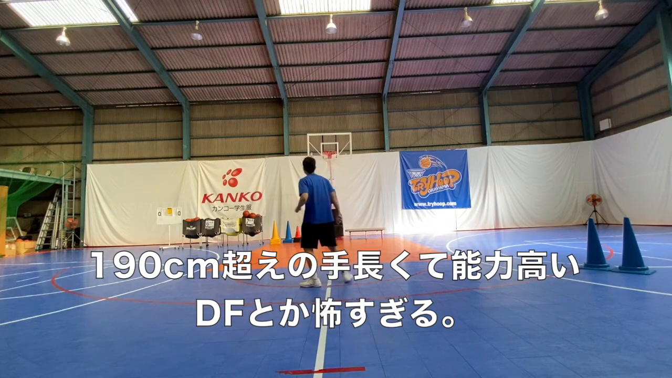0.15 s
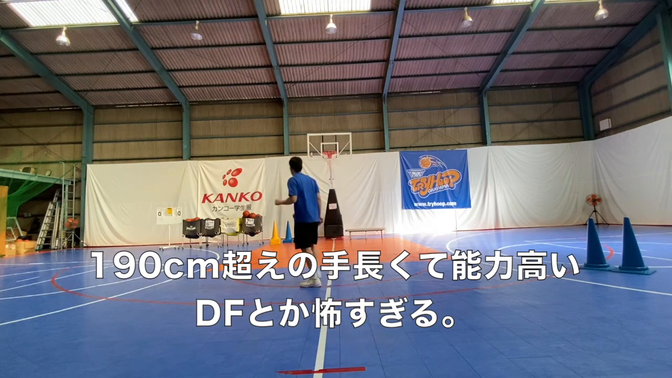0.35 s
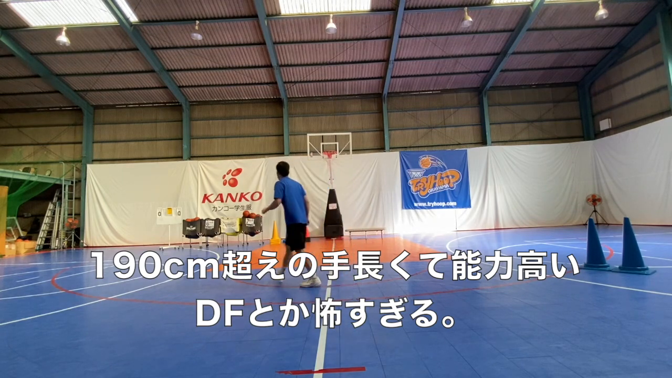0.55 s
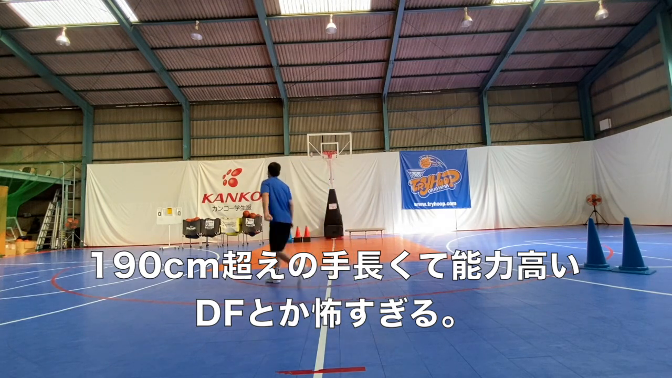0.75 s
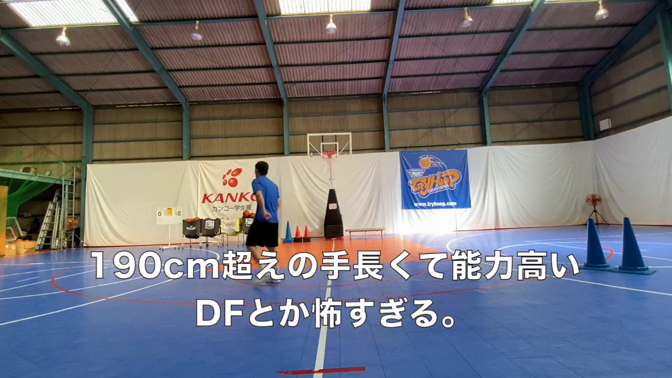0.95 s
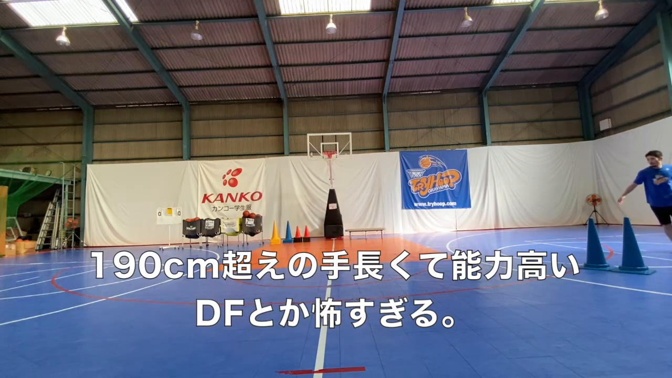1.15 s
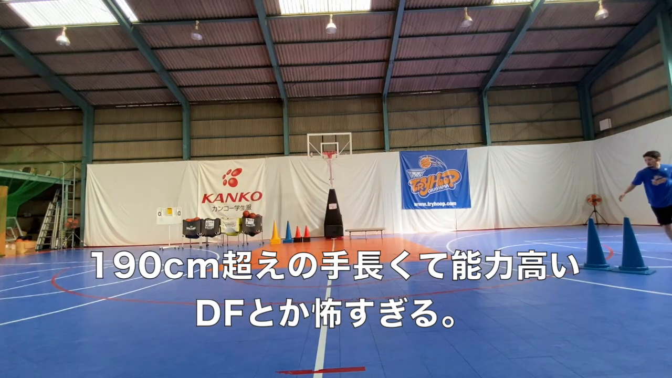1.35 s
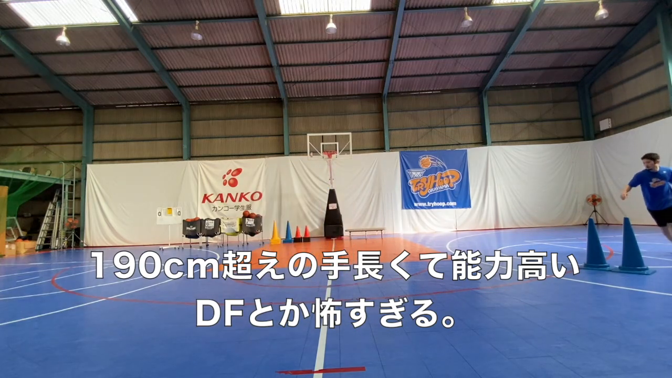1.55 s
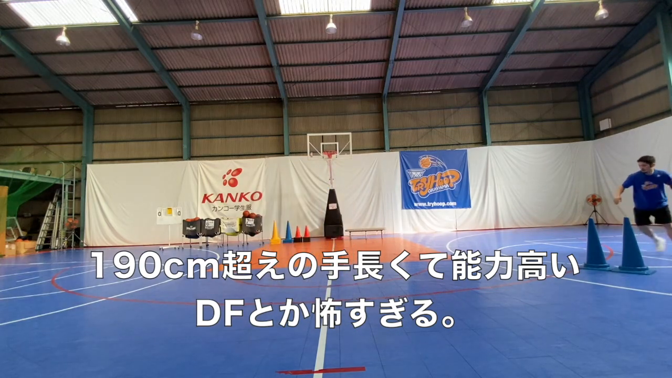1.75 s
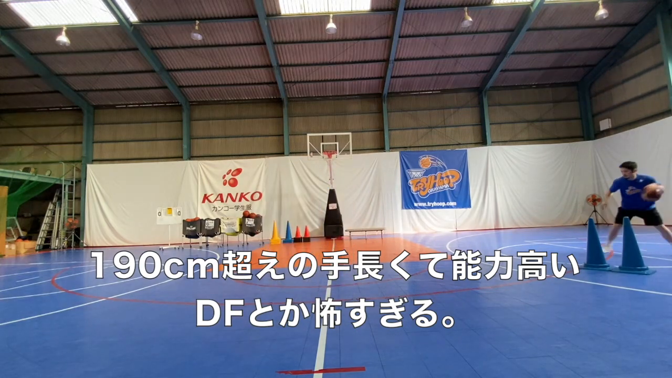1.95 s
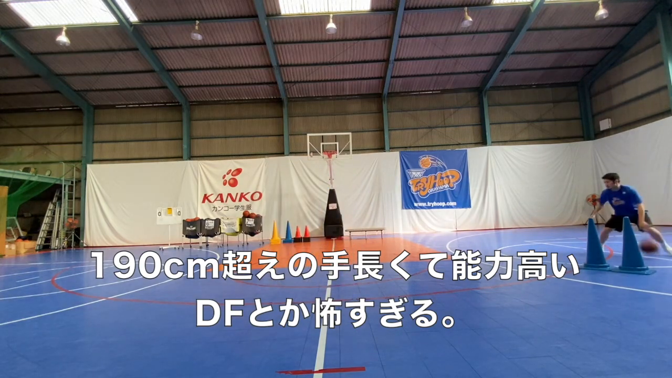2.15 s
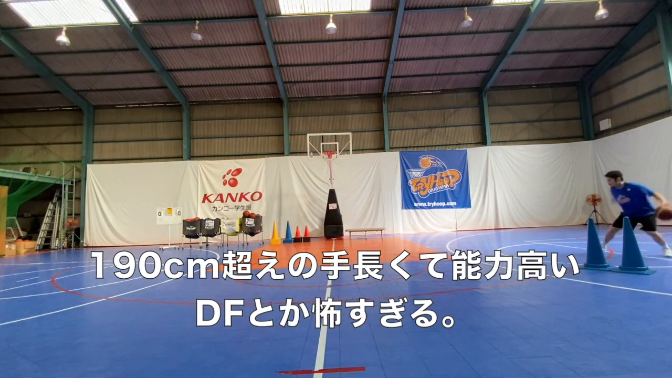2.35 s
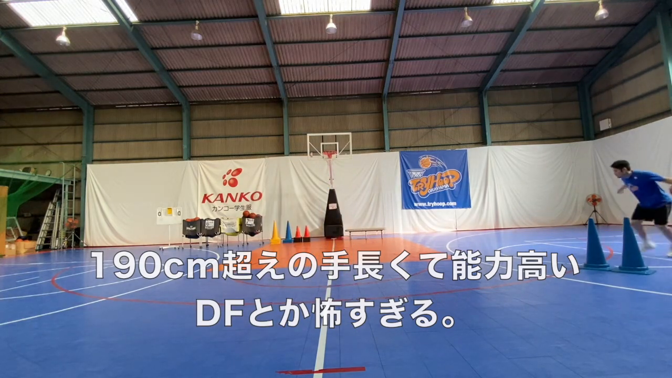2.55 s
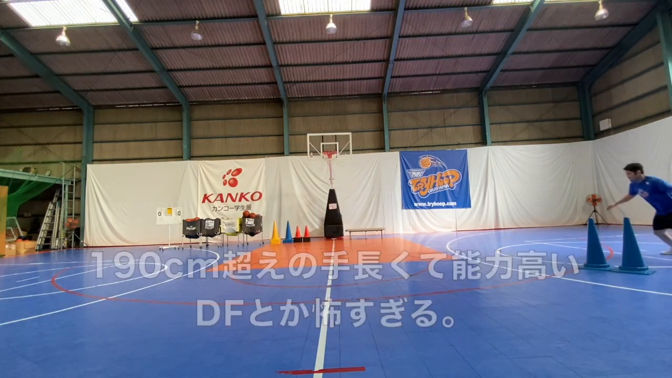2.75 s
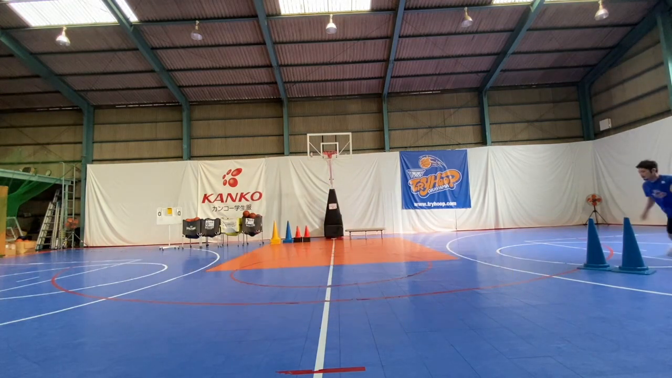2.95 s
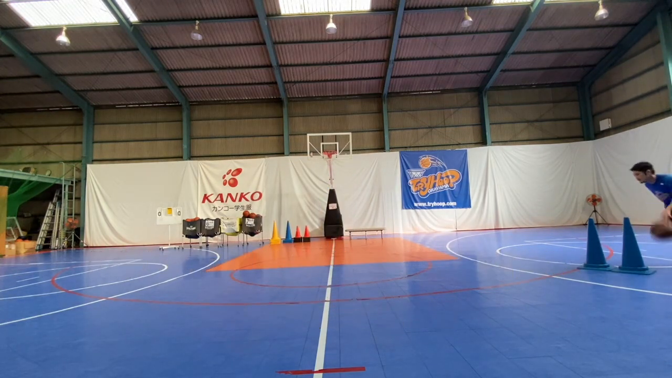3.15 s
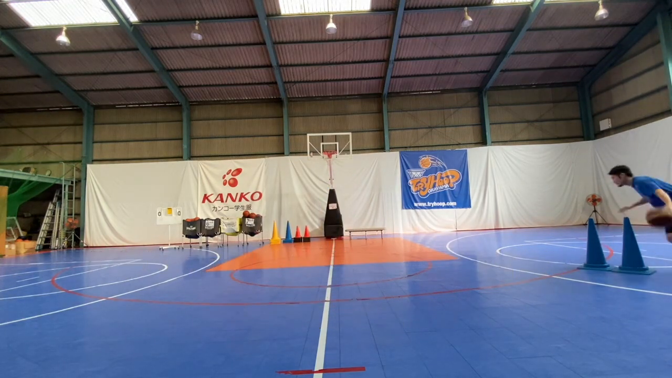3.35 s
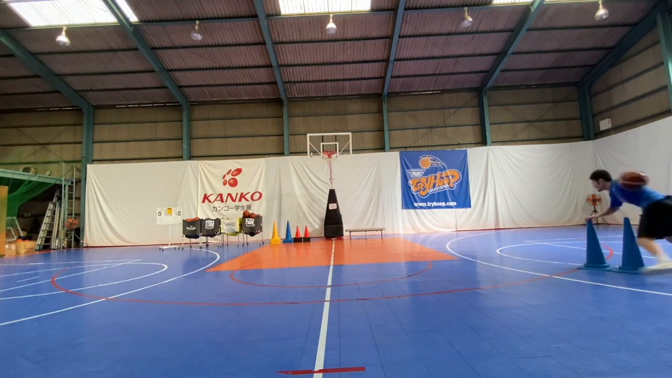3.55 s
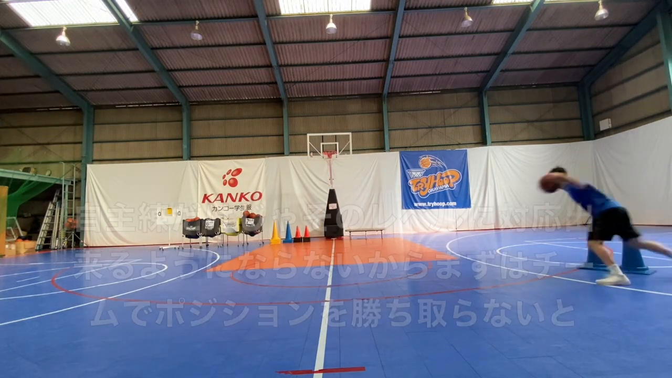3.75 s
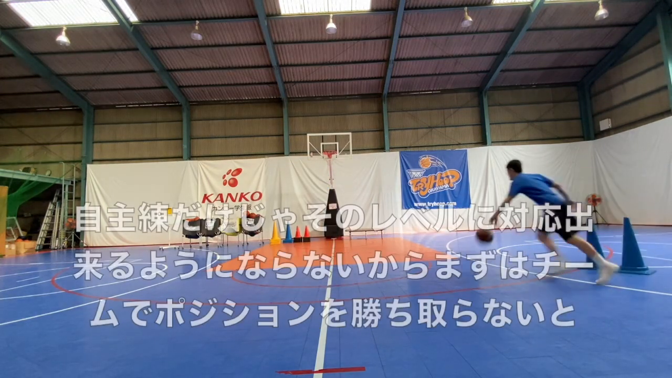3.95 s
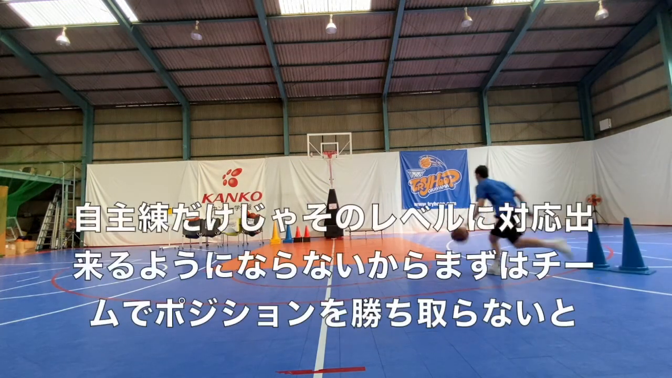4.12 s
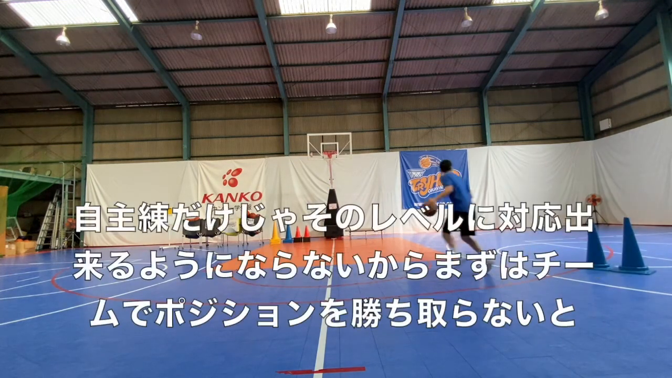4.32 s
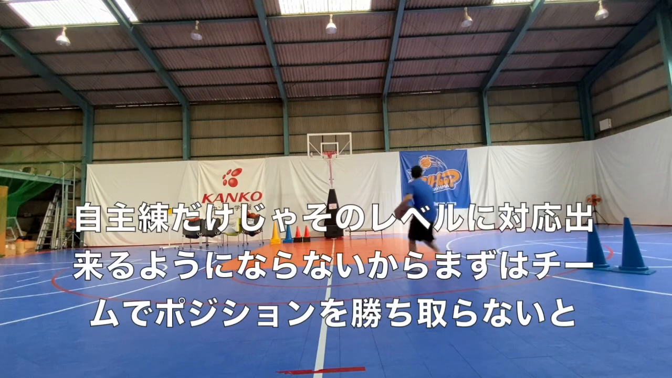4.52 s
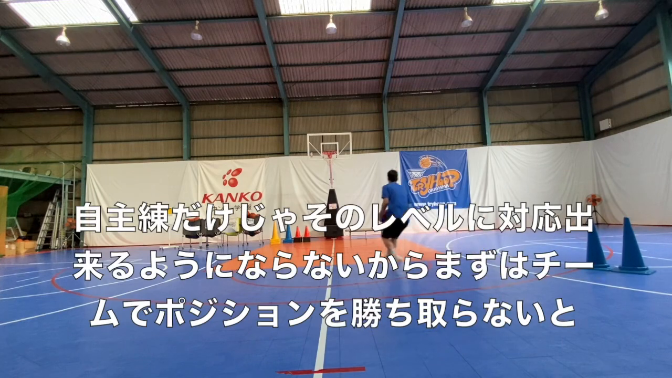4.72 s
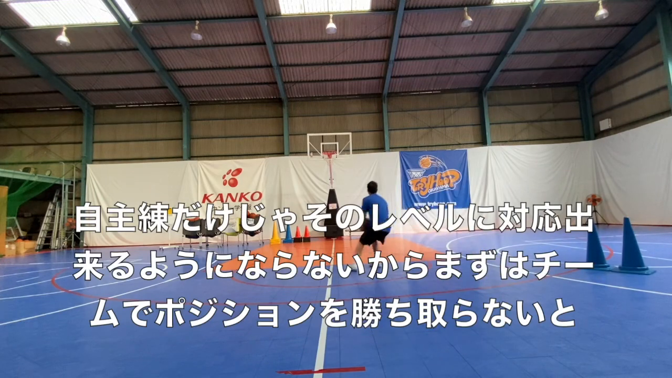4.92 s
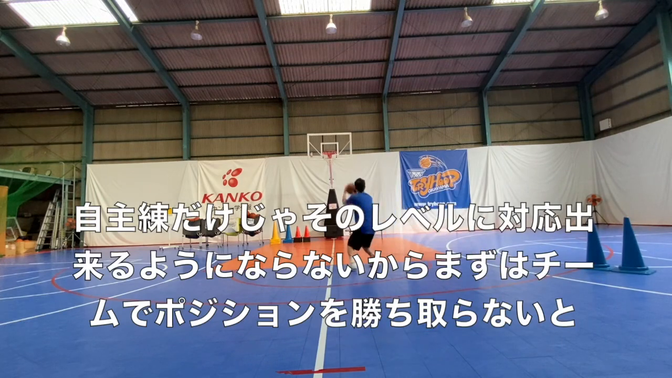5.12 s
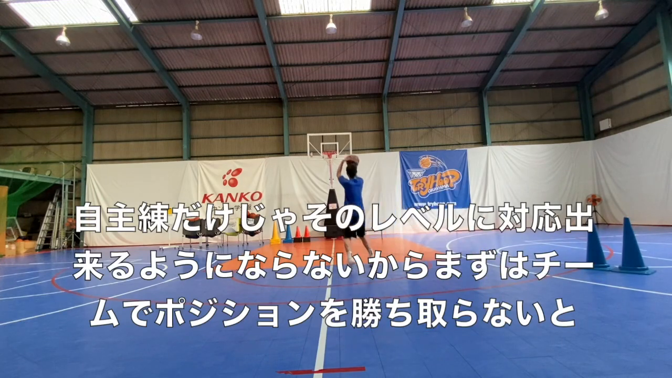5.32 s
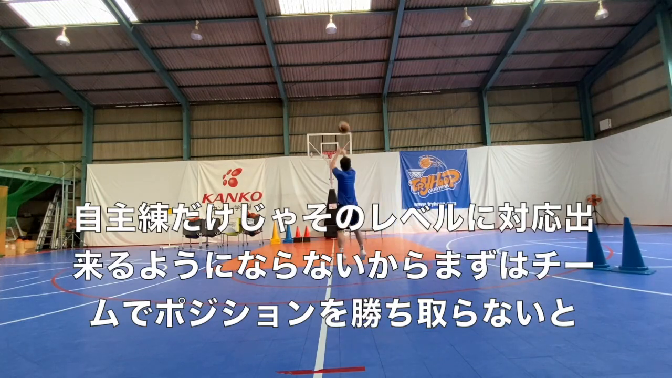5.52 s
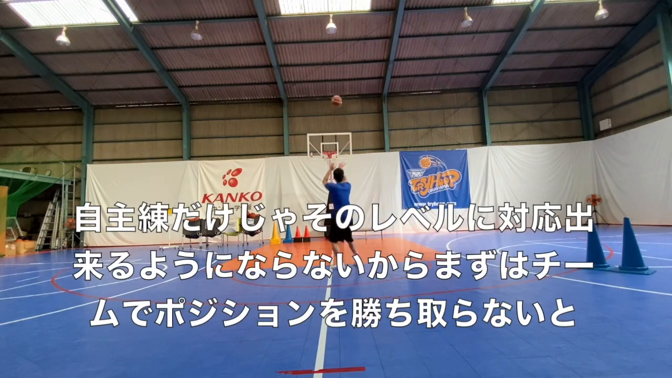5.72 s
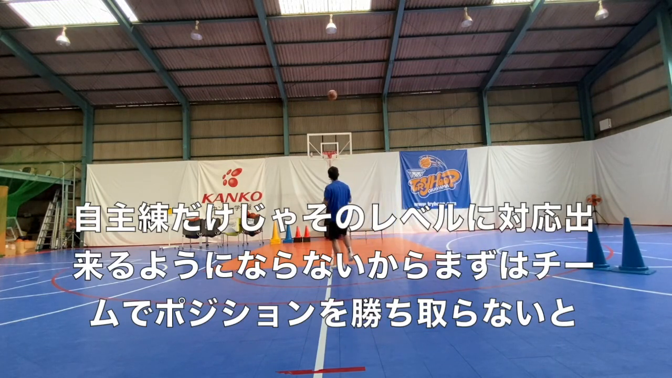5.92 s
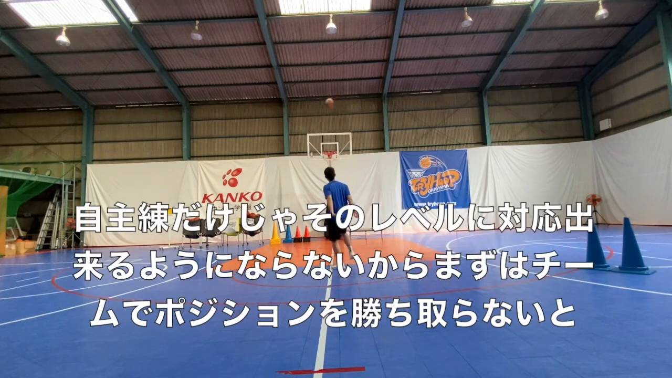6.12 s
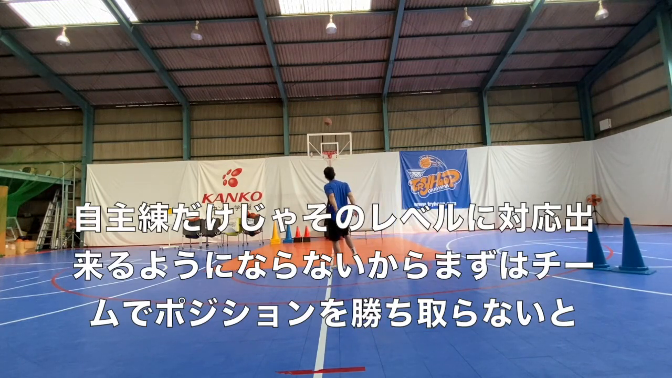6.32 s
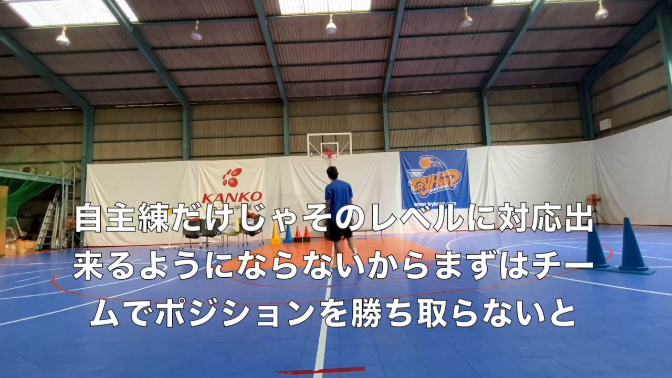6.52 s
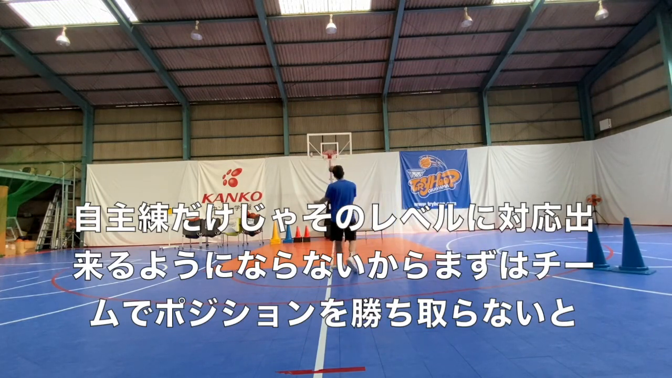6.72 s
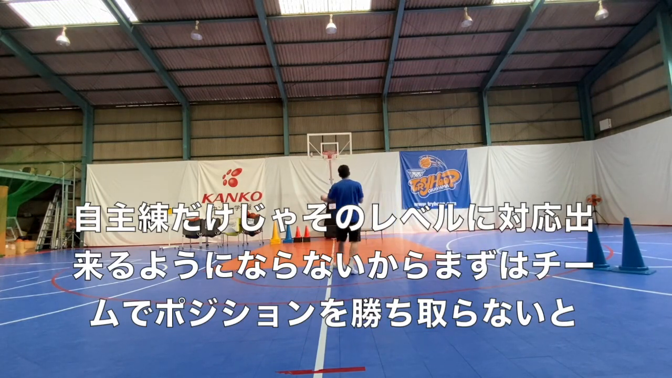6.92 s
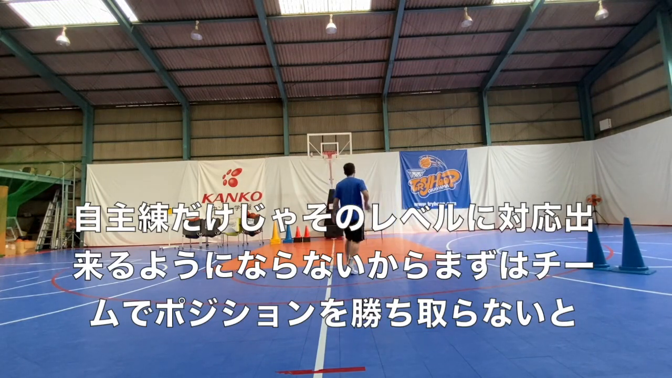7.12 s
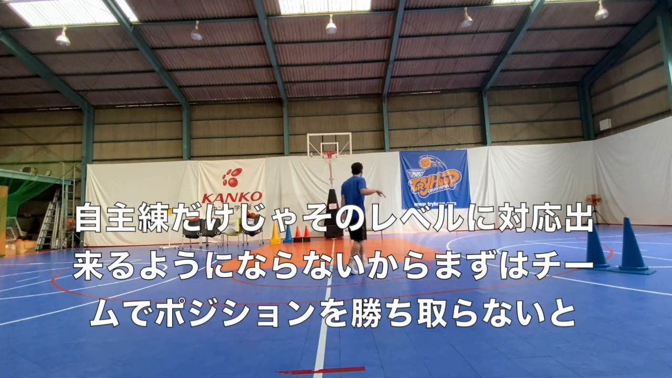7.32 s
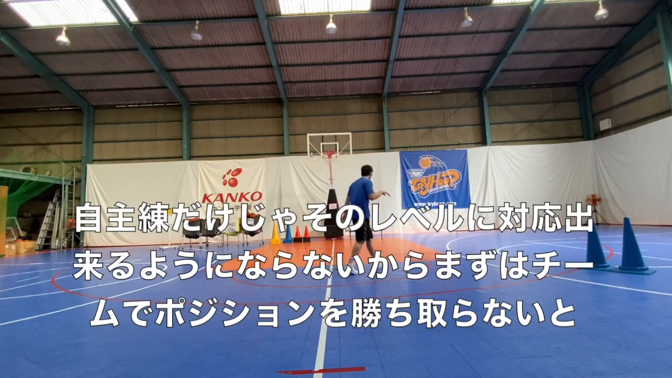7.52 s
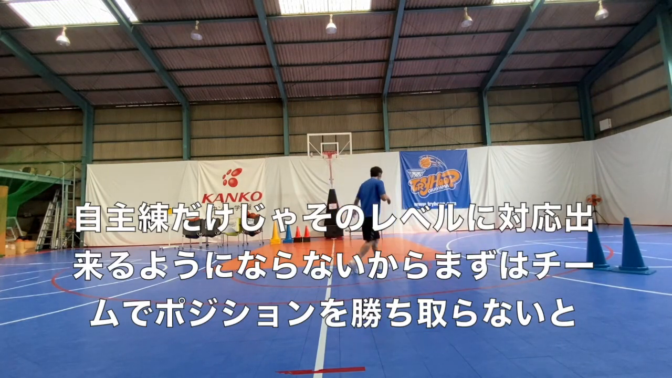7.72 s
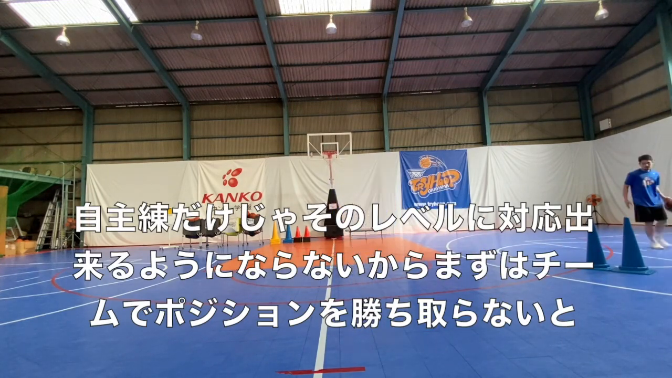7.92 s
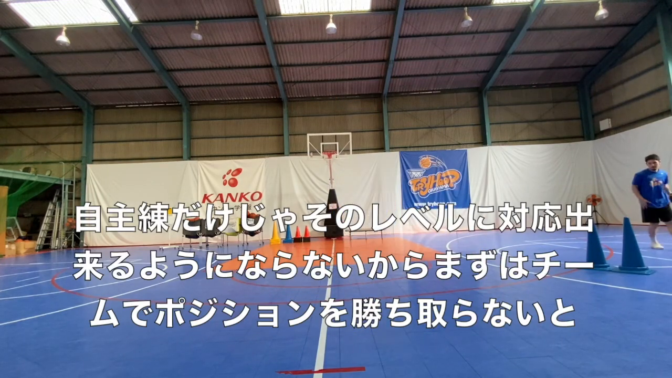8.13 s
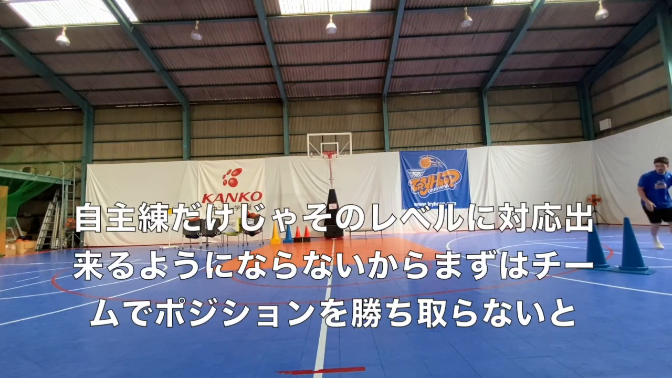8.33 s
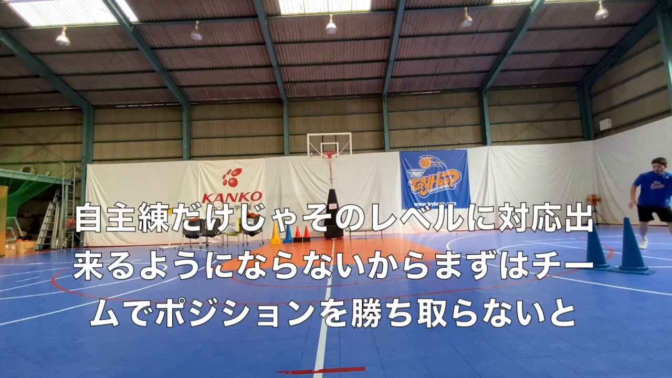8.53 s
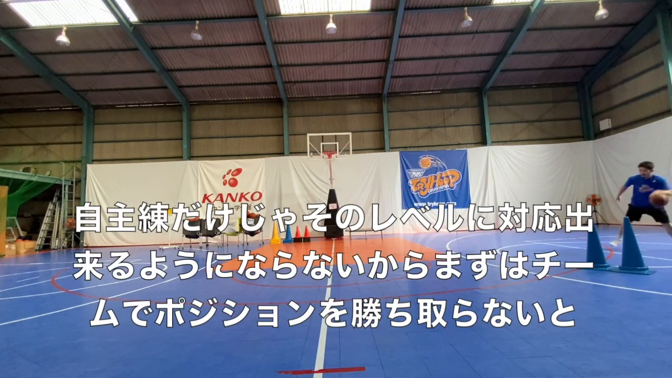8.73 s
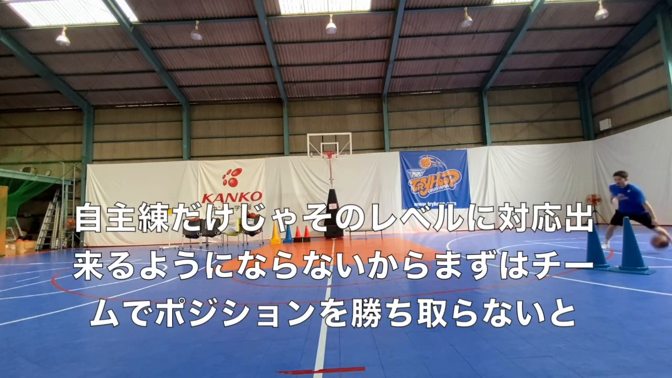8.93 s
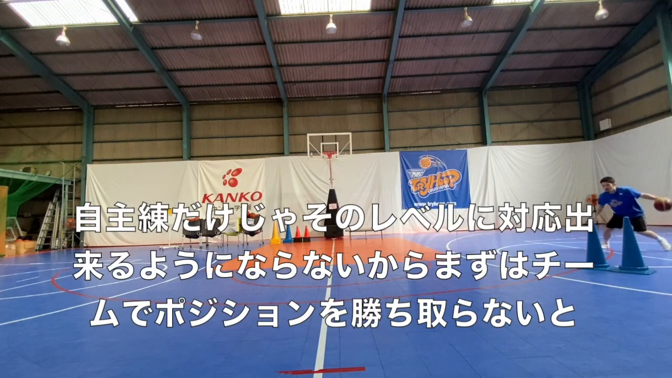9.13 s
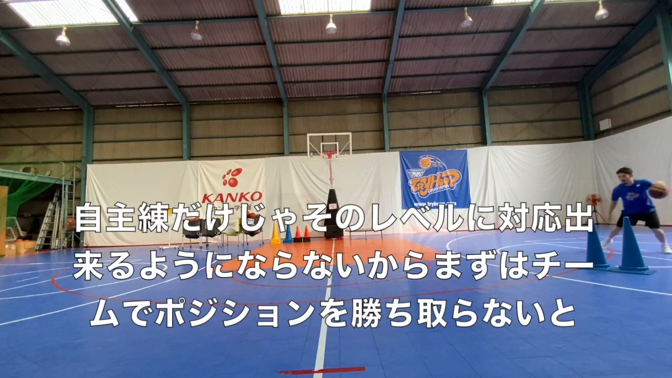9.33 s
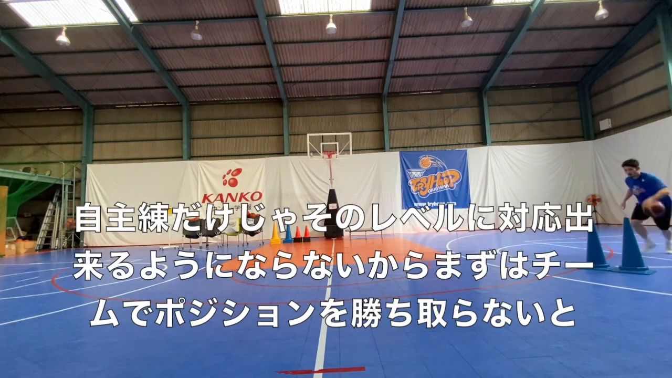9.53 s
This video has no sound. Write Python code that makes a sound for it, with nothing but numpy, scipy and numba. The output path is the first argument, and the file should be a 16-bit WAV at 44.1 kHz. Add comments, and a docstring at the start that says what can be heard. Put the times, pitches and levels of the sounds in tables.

```python
"""A basketball, dribbled and shot by a lone player in a bare sports hall, a few metres from a phone on the floor.
Each bounce slaps, rings the ball, booms in the boards and comes back off the near and far walls.
Rubber soles chirp, steps knock, faint ticks sound, and thuds of feet and rim arrive by way of the hall.
The room rings for two seconds; traffic and an engine rumble outside. The phone's two microphone ports
give the stereo, and its gain control turns down after loud blows."""
import sys
import numpy as np
from scipy import signal
from scipy.io import wavfile
from scipy.ndimage import uniform_filter1d
from numba import njit

SR = 44100
rng = np.random.default_rng(int(sys.argv[2]) if len(sys.argv) > 2 else 0)


def dump(signal):
    """Clip the signal to [-1, 1] and save it as 16-bit WAV at the path in sys.argv[1]."""
    limited = np.clip(np.atleast_2d(signal).T, -1, 1)
    pcm = np.round(limited * 32767).astype(np.int16)
    wavfile.write(sys.argv[1], SR, pcm)


N = 426447

# traffic as heard indoors: (frequency [Hz], spectral level [dB])
TRAFFIC_SPECTRUM = [(20, -39.5), (40, -10.5), (70, -11), (90, -32.5), (145, -26), (390, -40.5),
                    (1500, -49.5), (5000, -61.5), (12000, -86.5)]
# its slow swell: (time [s], gain [dB])
TRAFFIC_SWELL = [(0.0, -39.5), (1.64, -44), (2.48, -44), (3.34, -41.5), (4.98, -47), (7.0, -49.5),
                 (7.6, -37.5), (8.7, -46.5), (9.3, -40), (9.67, -42.5)]
# an engine outside, on two notes: (time [s], low note [dB], high note [dB])
ENGINE_LEVELS = [(0, -51, -65), (.95, -42, -56), (1.6, -59, -59.5), (1.903, -51, -56), (3.099, -57, -53),
                 (4.5, -51.5, -47.5), (4.9, -47.5, -46.5), (5, -68, -65), (5.6, -53, -58),
                 (9.67, -68, -64.5)]
# the hall's long ring: (frequency [Hz], time to fall 60 dB [s])
HALL_DECAY = [(50, 0.97), (130, 1.57), (260, 1.27), (480, 1.2), (920, 2.045), (1500, 2.14), (3000, 2.59),
              (6400, 1.654), (12000, 0.74)]
# first rounds between floor and near walls: (frequency [Hz], level over the long ring [dB])
HALL_EARLY = [(55, -3), (100, -1.5), (200, -8.5), (500, 3), (2000, -17.5), (10000, -7.5)]
# width of the room sound at the phone: (frequency [Hz], side minus mid [dB])
HALL_WIDTH = [(60, -16), (110, -13), (200, -11), (380, -2), (700, 2), (1290, 0.5), (2380, -0.5), (4400, 0),
              (8120, 0), (15000, -3)]
# its lean: (frequency [Hz], left minus right [dB])
HALL_BALANCE = [(60, 3), (110, 0.5), (200, 1.5), (380, 2), (700, 2.5), (1290, 2), (2380, 1.5), (4400, 4.5),
                (8120, 3), (15000, -6.5)]
# where the player stands: (time [s], lag at the left port [ms])
PLAYER_LAG = [(0, 0), (.9, 0), (1, .27), (4, .27), (4.4, .05), (4.8, 0), (7.8, 0), (7.9, .27), (9.67, .27)]
# a blow as the hall hears it: (frequency [Hz], spectral level [dB])
BLOW_SPECTRUM = [(25, -35), (50, 3.5), (86, 4.5), (124, -3), (200, -5.5), (400, -10.5), (700, -12),
                 (1000, -11), (1500, -13.5), (2100, -18), (2800, -20.5), (4000, -27), (7470, -29.5),
                 (12000, -41.5), (13500, -48.5)]
# reach of a blow's tone settings: (frequency [Hz], bass, body, presence, treble [shares])
TONE_SHARES = [(122, 1, 0.38, 0, 0), (236, 0.15, 0.94, 0, 0.37), (454, 0.21, 1, 0.25, 0.15),
               (730, 0, 0.71, 0.39, 0.47), (1340, 0.26, 0.28, 0.3, 0.23), (2000, 0.22, .09, 0, .45),
               (2700, 0.2, 0, 0, 0.59), (4000, 0.073, 0, 0, 0.85), (8000, 0.08, 0, 1, 1)]
# floor resonances common to all blows: (frequency [Hz], width [Hz], gain [dB])
BOARD_MODES = [(167, 19, -5), (198, 40, 5), (322, 70, 1), (610, 78, 1.5)]
# air in the ball, singing on into the hall: (frequency [Hz], width [Hz], gain [dB])
CAVITY_MODES = [(900, 180, 3), (1302, 69, 0), (1650, 38, 2), (2540, 140, 0.5)]
# push-off steps: (time [s], level [dB], pitch [Hz])
FOOTSTEPS = [(3.307, -26.5, 272), (3.41, -27, 243), (3.452, -26.5, 271), (3.561, -22, 125),
             (3.622, -31, 130)]
# faint bright ticks: (time [s], level [dB])
BRIGHT_TICKS = [(3.6639, -52), (3.9233, -48), (4.09, -34), (5.615, -55), (5.6331, -52), (6.604, -52),
                (6.62, -54), (6.629, -50), (7.7894, -57), (8.852, -50), (8.86, -52)]
# thuds of feet and rim, and hall rings that start abruptly with no slap: (time [s], level [dB], rise [s], then
# the colour: # bass [dB], body [dB], presence [dB], treble [dB], floor panel note [Hz], panel gain [dB], #
# cavity song [factor])
HALL_THUDS = [(.059, -18, 0.00035, -39, -5, 3, -36, 600, 2.3, .8),
              (1.017, 4.5, 0.0038, -1.5, -4, 0.5, -4.5, 226, 4.7, 1.1),
              (2.014, -14, 0.039, 12, 16, 1, 18, 313, 1.2, 0.12),
              (2.701, -17, 0.0019, 0, 19, -6, 18, 301, 1.6, 0.11),
              (2.884, -17.5, 0.025, 11, 21.5, 1, 28, 300, 1.6, 0.091),
              (3.42, -1, 0.0015, 2, -6, 3, 3, 270, 7.3, .4),
              (3.555, -3.5, 0.0062, 8.5, 3, 0, 6, 257, 6.2, 1.6),
              (4.447, -3, 0.0024, -8, 9, -5, -6, 298, 4, 0.11),
              (4.914, -7.5, 0.00078, -15, 0.5, -1.5, -22, 302, 2, .7),
              (5.614, -5.5, 0.00046, -11.5, 12, 1.5, -2, 315, 1.7, 0.086),
              (6.572, -14, 0.039, -32, -1.5, -7.5, 15, 600, 1.5, 0.46),
              (6.6, -3.5, 0.019, -1.5, 4.5, -10, -12.5, 615, 4, 5),
              (7.959, 1.5, 0.0029, -4.5, 0.5, -4, -1.5, 614, 4.9, 2.1),
              (8.848, -17.5, 0.0011, 12, 9, -4, 4, 302, 1.3, .1),
              (9.5, -20, 0.069, -7, 5, 2, 21, 300, 1.5, .5)]
# sole chirps: (time [s], level [dB], pitch [Hz], second partial [dB], third partial [dB],
#   left minus right [dB], length [s], glide [share], end sag [share], roughness [0-1], hall [dB],
#   overtones in the hall [dB], hall delay [s]); later levels are relative to the first
SOLE_CHIRPS = [(1.014, -50, 3536, 4.5, -16, 16, 0.018, -0.012, 0.01, 0.2, 15, -11, 0.01),
               (1.03, -45, 3740, -20, -26, -2, 0.0078, 0.095, .01, 0.3, 6, .5, .008),
               (2.018, -41, 4180, -12.5, -18, 2.5, 0.0075, -0.044, .06, 0.3, -2, 11, 0.018),
               (2.066, -42.5, 4230, -1.5, -12, 5, 0.0085, 0.023, .01, 0.34, 1, -4, 0.0099),
               (2.078, -45, 3660, -2, -12, 0, 0.011, -0.077, .01, 0.15, -1, 2, 0.013),
               (2.09, -39.5, 4240, -11, -24, 7, 0.005, 0.0011, .01, 0.15, -3, -0.5, 0.023),
               (2.373, -47, 3110, 2, -12, 13, 0.018, 0.054, .01, 0.3, 0.5, 1, 0.021),
               (2.419, -55.5, 3260, -12, -7.5, 5, 0.016, 0.00078, .01, 0.2, 11, -0.5, 0.01),
               (2.69, -37, 3560, -13, -28, -12, 0.011, -0.13, .03, 0, 11, -6, 0.026),
               (2.694, -33.5, 3380, -2.5, -11.5, -2.5, 0.0097, -0.11, .01, 0.25, 3.5, -5, 0.02),
               (3.2217, -23.5, 3200, -8.5, -11.5, -4, 0.011, -0.069, .01, 0.15, -4.5, -4.5, 0.016),
               (3.231, -25.5, 3080, 4.5, -6, -9, 0.014, 0.048, .01, 0.26, -9, -2, 0.017),
               (3.44, -30.5, 3130, 3, -17, 4.5, 0.0067, -0.11, .01, 0.3, -4, 0, 0.016),
               (3.457, -24.5, 2937, -4, -8.5, -2, 0.015, 0.0018, .01, 0.02, -7, 0, 0.024),
               (4.4575, -27.5, 3740, -5.5, -8, 8, 0.012, -0.089, .01, 0.31, -7.5, 1.5, 0.016),
               (4.460, -26.5, 3223, 4.5, -11, 8, 0.010, 0.1, .01, 0.4, -6, -3.5, 0.01),
               (4.9215, -41, 3690, -6, -12.5, 6.5, 0.0045, -0.067, .01, 0.3, -7.5, -5, 0.013),
               (4.926, -15.5, 3408, -10.5, -16, 8.5, 0.012, -0.034, 0.1, 0.11, -7.5, 5, 0.013)]
# chirp overtones beam forward and feed the hall less: (frequency [Hz], gain [dB])
CHIRP_HALL_SPECTRUM = [(6000, -1), (8500, -6), (13000, -9)]
# the ball's ring: (frequency [Hz], level [dB], time to fall 60 dB [s])
BALL_MODES = [(1076, 17.5, 0.0071), (786, 4, 0.02), (374, 4, 0.017), (1740, 16.5, 0.0046),
              (2720, -8.5, 0.009)]
# bounces near the phone: (time [s], level [dB], left minus right [dB], slap [dB], pop [dB], snap [dB],
#   snap pitch [Hz], boom [dB], boom pitch [Hz], boom delay [s], boom swell [s], boom's near echo [dB],
#   near wall delay [s], near echo [dB], far wall delay [s], far echo [dB], hall [dB],
#   then the colour as for thuds); later levels are relative to the first, echoes to what they return
BOUNCES = [(0.2040, -23, 5, -1.5, 1.5, -16, 8740, 6.5, 105, 0.0154, 0.0056, -18, 0.009, 3.5, 0.026, 0, 32.5, 13.5, -0.5, 1, 4, 720, 8.5, 2),
           (2.2111, -20.5, -4, 5, -13, -1, 7200, 4.5, 106, 0.0037, 0.0083, 6, 0.0061, 2.5, 0.033, -32, 25, 17, 9, 3, 14, 620, 2.5, 0.33),
           (3.228, -16, -6.5, 5, 2, -14, 7350, 9, 126, 0.0061, .0048, -13, 0.0062, -3, 0.0078, -32, 25.5, 12.5, 0.5, 4, 4.5, 272, 14, 1.3),
           (4.0283, -11, 11, -1.5, -4.5, -8.5, 7070, 0.5, 106, 0.0039, 0.007, 1, 0.0079, 2, 0.029, -16, 21, 7, 6.5, 4.5, 3.5, 597, -1.5, 0.77),
           (7.1951, -23.5, 3, -7, 6, 0, 6500, 9.5, 112, 0.0152, .0048, -10, 0.0091, 4.5, .026, 6.5, 36, 10.5, -3, 2.5, -0.5, 319, 9, 0.73),
           (8.9239, -20, -4, 0.5, -17, -1.5, 8650, 6, 111, 0.0041, 0.0073, -15, 0.0068, -0.5, 0.061, -25, 28.5, 6, 5, 2.5, 1.5, 430, -2, 0.16)]
# overall tone, thin in the deep bass and dull in the top treble: (frequency [Hz], gain [dB])
OVERALL_TONE = [(20, -23), (45, -10), (80, -3.5), (11500, 1.5), (13000, -3.5), (16000, -5.5)]


def undb(db):
    return 10 ** (np.asarray(db) / 20)


def along(table, hz):
    """Reads (Hz, value) points on a log-frequency axis."""
    f, v = np.transpose(table)
    return np.interp(np.log(np.maximum(hz, 1)), np.log(f), v)


def bumps(modes, hz):
    """Sum of bell curves, one for each (centre, width, height)."""
    return sum(height * np.exp(-((hz - centre) / width) ** 2) for centre, width, height in modes)


def band(x, lo_hz, hi_hz):
    """Gentle band-pass."""
    sos = signal.butter(2, [lo_hz, min(hi_hz, .45 * SR)], "bandpass", fs=SR, output="sos")
    return signal.sosfilt(sos, x)


def crack(t, lo_hz, hi_hz, width_s):
    """A burst of noise that swells and dies, peak 1."""
    u = t / width_s
    x = band(rng.standard_normal(len(t)) * u ** 2 * np.exp(-u), lo_hz, hi_hz)
    return x / np.abs(x).max()


def add(out, x, s):
    """Mixes x into out from time s on."""
    i = int(s * SR)
    out[:, i:i + x.shape[1]] += x[:, :N - i]


def place(x, s, pan_db):
    """Onto the two ports: left is louder by pan_db and lags by the player's position at time s."""
    lag = round(np.interp(s, *np.transpose(PLAYER_LAG)) * SR / 1000)
    x = np.pad(x, (0, lag))
    return np.array([np.roll(x, lag), x]) * undb([[pan_db / 2], [-pan_db / 2]])


def diffuse(count, gain, hop=512):
    """Noise from all round the phone, shaped by gain(Hz, s); alike on both ports in the bass."""
    hz = np.fft.rfftfreq(4 * hop, 1 / SR)[:, None]
    s = np.arange(count // hop + 2) * hop / SR
    re, im = rng.standard_normal((2, 2, len(hz), len(s)))
    mid, side = (re + 1j * im) * gain(hz, s)
    side = side * undb(along(HALL_WIDTH, hz))
    lean = undb(along(HALL_BALANCE, hz) / 2)
    ports = np.array([(mid + side) * lean, (mid - side) / lean])
    return signal.istft(ports, noverlap=3 * hop)[1][:, :count]


def outdoor_rumble(low_hz=74.9, high_hz=110.5, width_hz=5.7):
    """Distant traffic and a droning engine, heard through the sheet walls."""
    times, *notes_db = np.transpose(ENGINE_LEVELS)
    def gain(hz, s):
        low, high = (undb(np.interp(s, times, db)) for db in notes_db)
        engine = bumps([(low_hz, width_hz, low), (high_hz, width_hz, high)], hz)
        traffic = undb(along(TRAFFIC_SPECTRUM, hz) + np.interp(s, *np.transpose(TRAFFIC_SWELL)))
        return traffic + engine
    return diffuse(N, gain, hop=2048)


def hall(colour_db, rise_s=0.011, early_t60_s=1, speckle_db=2.5, speckle_s=0.17):
    """The room's answer: reflections thicken, then each band dies at its own pace; mid-band energy 1."""
    def fading(hz, s):
        late = undb(-60 * s / along(HALL_DECAY, hz))
        early = undb(along(HALL_EARLY, hz) - 60 * s / early_t60_s)
        return undb(colour_db(hz, s)) * np.hypot(late, early)
    tail = diffuse(int(1.9 * SR), fading)
    t = np.arange(tail.shape[1]) / SR
    # single reflections stand out of the young tail
    speckle = uniform_filter1d(np.repeat(rng.standard_normal(len(t) // 64 + 1), 64)[:len(t)], 64)
    tail = tail * (1 - np.exp(-t / rise_s)) * undb(speckle_db * speckle * np.exp(-t / speckle_s))
    return tail / np.sqrt(np.sum(band(tail, 986, 1880) ** 2))


def blow_colour(colour, lump_db=3.5, lump_hz=45.5, song_fade_s=1):
    """Spectrum of one blow in the hall: boards, the panel struck and the air in the ball resonate."""
    *tone_db, panel_hz, panel_db, song = colour
    tone = [(hz, np.dot(shares, tone_db)) for hz, *shares in TONE_SHARES]
    floor_modes = BOARD_MODES + [(panel_hz, 0.091 * panel_hz, panel_db)]
    lumps = lump_db * rng.standard_normal(128)  # each spot in the hall favours other narrow bands
    def colour_db(hz, s):
        cavity = song * bumps(CAVITY_MODES, hz) * np.exp(-s / song_fade_s)
        spot = np.interp(hz / lump_hz, np.arange(len(lumps)), lumps, right=0)
        return along(BLOW_SPECTRUM, hz) + along(tone, hz) + bumps(floor_modes, hz) + cavity + spot
    return colour_db


def hall_thuds(out):
    """Room sound only: thuds of feet and rim, or a ring in the hall that starts abruptly with no slap before
    it."""
    for s, db, rise_s, *colour in HALL_THUDS:
        add(out, undb(db) * hall(blow_colour(colour), rise_s), s)


def ticks(out, centre_hz=7050):
    """Faint bright ticks, some alone, some edging a thud or following a bounce."""
    t = np.arange(1024) / SR
    for s, db in BRIGHT_TICKS:
        add(out, place(undb(db) * crack(t, centre_hz / 2, 2 * centre_hz, 0.00082), s, 0.42), s)


def footsteps(out, swell_cycles=1.2):
    """A foot pushing off draws a short rounded knock from the boards."""
    t = np.arange(4096) / SR
    for s, db, hz in FOOTSTEPS:
        u = t * hz / swell_cycles
        knock = undb(db) * u * np.exp(1 - u) * np.sin(2 * np.pi * hz * t)
        add(out, place(knock, s, 1.4), s)


def sole_chirps(out, stumble=0.11, near_wall_s=0.0105):
    """Rubber sticks and slips a few thousand times a second; the rate sags and stumbles under load."""
    for (s, db, hz, second_db, third_db, pan_db, length_s, glide, sag, rough,
         hall_db, upper_db, hall_s) in SOLE_CHIRPS:
        u = np.linspace(0, 1, int(length_s * SR))
        wobble = uniform_filter1d(rng.standard_normal((2, 4096)), 32)[:, :len(u)] * 5.6
        rate = hz * (1 + glide * (u ** 2.05 - .2) - sag * u ** 7.4 + stumble * rough * wobble[0])
        phase = 2 * np.pi * np.cumsum(rate) / SR
        envelope = undb(db) * np.sin(np.pi * u ** 1.03) ** 0.84 * np.maximum(1 + rough * wobble[1], 0)
        first = envelope * np.sin(phase)
        second = envelope * undb(second_db) * np.sin(2 * phase)
        upper = second + envelope * undb(third_db) * (np.sin(3 * phase) + 0.066 * np.sin(4 * phase))
        add(out, place(first + upper, s, pan_db), s)
        # a chirp aimed away, into the hall, comes back weaker off the near wall
        echo = undb(-6.5 - 1.04 * hall_db) * (first + second)
        add(out, place(echo, s, 1.5), s + near_wall_s)
        sent = undb(hall_db) * (first + undb(upper_db) * upper)
        room = hall(lambda f, _: along(CHIRP_HALL_SPECTRUM, f), rise_s=0.0058)
        add(out, signal.fftconvolve(room, sent[None], axes=1), s + hall_s)


def floor_boom(t, hz, swell_s, sag_per_s=15):
    """The boards take a few milliseconds to swing up, and sag in pitch."""
    u = t / swell_s
    cycles = hz * (1 - np.exp(-sag_per_s * t)) / sag_per_s
    return u * np.exp(1 - u) * np.sin(2 * np.pi * cycles)


def air_pop(t, hz=1800, width_s=0.00013):
    """Air squeezed from under the ball pops once."""
    return -t / width_s * np.exp(1 - t / width_s) * np.sin(2 * np.pi * hz * t)


def ball_ring(t, squash_s=0.00079):
    """The ball's modes swell in as it flattens, a little different on every bounce."""
    scatter = rng.standard_normal((len(BALL_MODES), 2)) * (1.5, .04)
    modes = sum(undb(db + stray_db - 60 * t / t60) * np.sin(2 * np.pi * hz * (1 + detune) * t)
                for (hz, db, t60), (stray_db, detune) in zip(BALL_MODES, scatter))
    return -0.6 * (1 - np.exp(-t / squash_s)) * modes


def bounces(out):
    """The ball hits the floor a few metres off: direct sound, two wall echoes, then the hall."""
    t = np.arange(4096) / SR
    for (s, db, pan_db, slap_db, pop_db, snap_db, snap_hz, boom_db, boom_hz, boom_s, swell_s,
         boom_echo_db, near_s, near_db, far_s, far_db, hall_db, *colour) in BOUNCES:
        direct, near, far = undb([db, db + near_db, db + far_db])
        ring = ball_ring(t)
        # the ball's skin and the floor tiles rattle on after the first crack
        slap = crack(t, 1800, 24000, 0.000064) + undb(-8.5) * crack(t, 1500, 8300, 0.0037)
        skin_snap = undb(snap_db) * crack(t, snap_hz / 1.8, snap_hz * 1.2, 0.00023)
        pop = undb(pop_db) * air_pop(t) + skin_snap
        boom = undb(boom_db) * floor_boom(t, boom_hz, swell_s)
        add(out, place(direct * (undb(slap_db) * slap + pop), s, pan_db), s)
        add(out, place(direct * ring, s, pan_db), s + 0.00035)
        add(out, place(direct * boom, s, 1.0), s + boom_s)
        # the near wall returns the slap narrower and more smeared
        smeared = undb(slap_db - 11.5) * crack(t, 1500, 10000, .00035)
        add(out, place(near * (smeared + pop), s, 0.8), s + near_s)
        add(out, place(near * undb(-3.5) * ring, s, 0.494), s + near_s + 0.0004)
        add(out, place(direct * undb(boom_echo_db) * boom, s, 0.82), s + boom_s + near_s)
        # the far wall's echo reaches both ports at once
        add(out, place(far * crack(t, 480, 1960, 0.006), 0, 1.8), s + far_s)
        add(out, place(far * 0.5 * ring, 0, 1.5), s + far_s + 0.00039)
        add(out, place(far * undb(-3.5) * boom, 0, 1), s + far_s + 0.0061)
        add(out, undb(db + hall_db) * hall(blow_colour(colour)), s + .006)


def scene():
    """All that reaches the phone on the floor."""
    out = outdoor_rumble()
    bounces(out)
    hall_thuds(out)
    sole_chirps(out)
    ticks(out)
    footsteps(out)
    return out


@njit
def follow(x, attack_s, release_s):
    """Level follower with separate rise and fall times."""
    level, levels = 0., np.empty(len(x))
    for i in range(len(x)):
        level += (x[i] - level) / (SR * (attack_s if x[i] > level else release_s))
        levels[i] = level
    return levels


def record(dry):
    """Deep bass is thinned and top treble dulled; gain control leans on loud blows, peaks are rounded."""
    threshold_db, ceiling, top_hz = -27, 0.85, 16400
    hz = np.linspace(0, SR / 2, 2049)
    tone = signal.firwin2(2047, hz, undb(along(OVERALL_TONE, hz)), fs=SR)
    x = signal.fftconvolve(dry, tone[None], "same", axes=1)
    level = follow(np.abs(x).max(axis=0), attack_s=0.026, release_s=0.35)
    gain = undb(6) * np.minimum(undb(threshold_db) / (level + 1e-9), 1) ** 0.19
    rounded = ceiling * np.tanh(x * gain / ceiling)
    top_cut = signal.ellip(8, .2, 70, top_hz, fs=SR, output="sos")
    return signal.sosfilt(top_cut, rounded)


dry = scene()
out = record(dry)
dump(out)
```